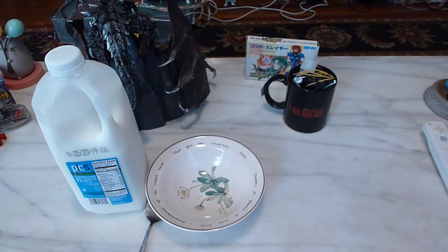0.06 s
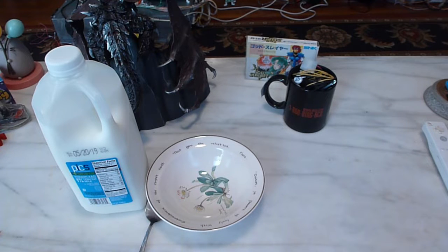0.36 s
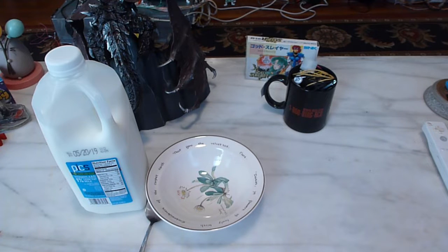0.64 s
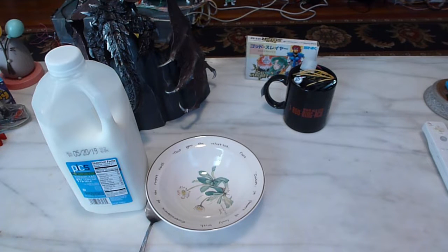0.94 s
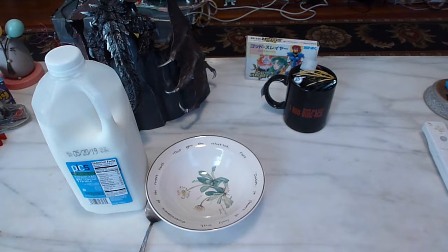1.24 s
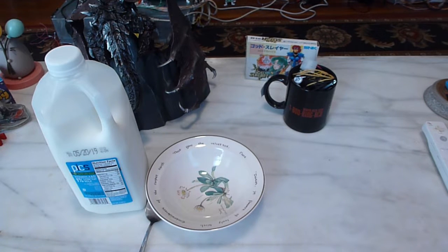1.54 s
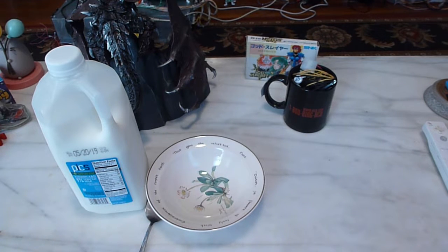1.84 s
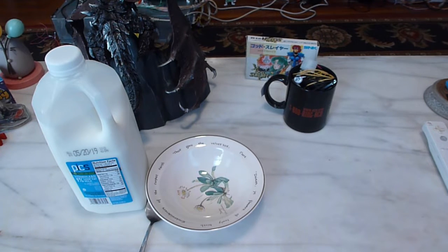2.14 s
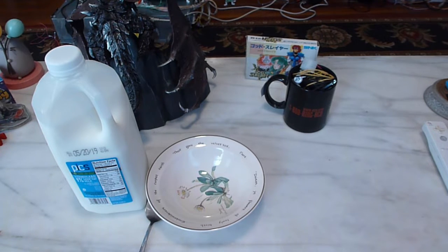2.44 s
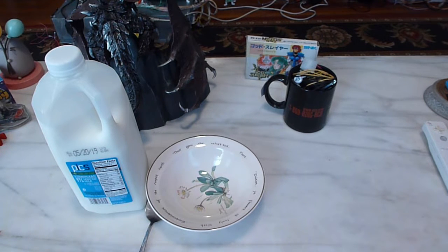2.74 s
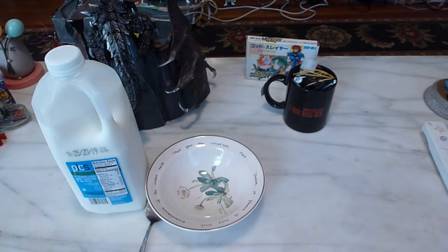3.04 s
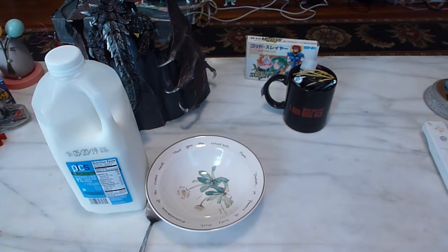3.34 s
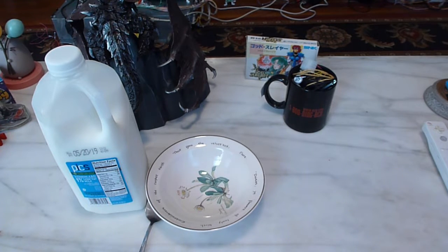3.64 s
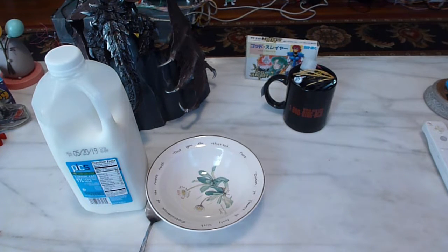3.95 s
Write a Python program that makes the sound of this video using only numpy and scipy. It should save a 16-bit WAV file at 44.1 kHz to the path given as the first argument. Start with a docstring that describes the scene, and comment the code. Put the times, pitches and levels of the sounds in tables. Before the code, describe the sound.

A plastic liner bag crackles inside a cereal box, with cardboard scrapes and two thumps.

```python
"""Cereal box and liner bag

Hands work at the bag inside a cereal box, a little way off in a small room. The bag crackles
in handfuls of tiny clicks, and single creases snap. Mostly later on, card scrapes on card,
the flaps knock, and the box bumps on the table and makes it hum."""
import sys
import numpy as np
from scipy import signal
from scipy.io import wavfile

SR = 44100
rng = np.random.default_rng(int(sys.argv[2]) if len(sys.argv) > 2 else 0)


def log_audio(samples):
    """Write samples as a 16-bit WAV file to the path given in sys.argv[1]."""
    # one column per channel
    frames = np.atleast_2d(samples).T
    # limit to full scale, then quantise
    limited = np.clip(frames, -1, 1)
    pcm = np.round(limited * 32767).astype(np.int16)
    wavfile.write(sys.argv[1], SR, pcm)


N = 176400


def amp(db):
    """Turns decibels into a number to multiply by."""
    return 10 ** (np.asarray(db) / 20)


def unit(x):
    """Scales a sound to an average (rms) level of one."""
    return x / np.sqrt(np.mean(x ** 2) + 1e-20)


def read(points, hz):
    """Looks up values between a table's rows, on a log-frequency scale."""
    f, value = np.transpose(points)
    return np.interp(np.log(hz + 1), np.log(f + 1), value)


def add(mix, s, sound):
    """Mixes a sound in, starting at s seconds."""
    part = mix[max(round(s * SR), 0):][:len(sound)]
    part += sound[:len(part)]


def colour(x, points, size=4096):
    """Shapes the bass and treble to follow a table, with no ringing ahead of a click."""
    log_gain = np.log(amp(read(points, abs(np.fft.fftfreq(size, 1 / SR)))))
    response = np.exp(np.conj(signal.hilbert(log_gain)))
    taps = np.fft.ifft(response).real[:size // 2]
    return signal.oaconvolve(x, taps)[:len(x)]


def ring(x, hz, q):
    """Makes a sound ring at one pitch; a higher q rings longer."""
    return signal.lfilter(*signal.iirpeak(min(hz, SR / 4), max(q, .6), SR), x)


def effort(rows, curve):
    """Each hand movement swells and dies away; overlapping ones add in power."""
    t, power = np.arange(N) / SR, 0
    for s, rise, fall, db in rows:
        from_peak = abs(t - s) / np.where(t < s, rise, fall)
        power += amp(db) ** 2 * np.exp(-2 * from_peak ** curve)
    return np.sqrt(power)


def crackle(level, per_s, thinning, spread_db, cap, q, plain, low_hz, high_hz, count=14):
    """Tiny random clicks each ring one small patch; they thin out as the hands ease off."""
    out, density = np.zeros(N), (level / level.max()) ** thinning
    for hz in np.geomspace(low_hz, high_hz, count):
        size = amp(spread_db * np.minimum(rng.exponential(1, N), cap)) * rng.choice([-1, 1], N)
        happens = rng.random(N) < density * per_s / count / SR
        clicks = size * happens / np.sqrt(density + .0087)  # makes up for having fewer clicks
        out += ring(clicks, hz, q) + plain * clicks
    return out


def blows(rows, q, chatter, chatter_s, low, high, size=4096):
    """A sharp push and a brief chatter ring the spot hit, from low to high times its pitch."""
    out, t = np.zeros(N), np.arange(size) / SR
    for (s, db, hz), noise in zip(rows, rng.standard_normal((len(rows), size))):
        push = (t == 0) + chatter * noise * np.exp(-t / chatter_s)
        band = signal.butter(2, [low * hz, min(high * hz, SR / 3)], "band", fs=SR, output="sos")
        hit = signal.sosfilt(band, ring(push, hz, q))
        add(out, s, amp(db) * hit / abs(hit).max())
    return out


# Tone of the quiet room: f/Hz, relative level/dB
AIR_TONE = [(25, -18), (60, -7.5), (400, -3), (2000, -15), (12000, -48)]
def air():
    """A faint, steady, low rush fills the room."""
    return amp(-48) * unit(colour(rng.standard_normal(N), AIR_TONE))


# How long the room's echo takes to fade by 60 dB: f/Hz, fade/s
ECHO_FADES = [(100, 0.26), (500, 0.38), (4500, 0.59), (12000, 0.3)]
def room(x, early_db, early_s, tail_db, moves_per_s=9, size=32768, count=4):
    """Quick echoes, then a fading tail; the pattern shifts as the sounding spot moves over the box."""
    t, out = np.arange(size) / SR, x
    moves = moves_per_s * np.arange(N) / SR
    for k in range(count):
        taps = rng.choice([-1., 1.], (2, size)) * (rng.random((2, size)) < 3000 / SR) * (t > .002)
        early = taps[0] * np.exp(-t / early_s)
        hz, when, bands = signal.stft(taps[1], SR, nperseg=256)
        fade = np.exp(-np.log(1000) * when / read(ECHO_FADES, hz)[:, None])
        tail = signal.istft(bands * fade, SR)[1][:size]
        echo = amp(early_db) * early / np.linalg.norm(early) + amp(tail_db) * tail / np.linalg.norm(tail)
        share = np.sqrt(2 / count) * np.cos(np.pi * (moves * (1 + k / count) + k / count))
        out = out + signal.fftconvolve(x * share, echo)[:N]
    return out / np.sqrt(1 + amp(early_db) ** 2 + amp(tail_db) ** 2)


# The box walls bending: peak t/s, rise/s, fall/s, level/dB
WALL_BENDS = [(.57, 0.015, 0.026, -41.5), (1.82, 0.043, .044, -36.5), (2.12, .11, .055, -48.5),
              (3.035, 0.018, 0.095, -39)]
# Their tone: f/Hz, relative level/dB
WALL_TONE = [(30, -49), (60, 4), (170, 9), (300, 5.5), (700, -55)]
def box_walls():
    """The walls of the box bend under the hands with a soft, low flutter."""
    return unit(colour(rng.standard_normal(N), WALL_TONE)) * effort(WALL_BENDS, curve=2.4)


# Notes the table top rings with: f/Hz, peak level/dB, time to fade by 60 dB/s
TABLE_NOTES = [(62.5, -44, 0.4), (115, -27, .28), (177, -33, 0.4)]
def table_bump(start_s=3.03, settle_s=.031, size=32768):
    """The box judders to rest and shakes the table top into a brief, rough hum."""
    out, t = np.zeros(N), np.arange(size) / SR
    judder = rng.standard_normal(size) * np.exp(-t / settle_s)
    for hz, db, fade_s in TABLE_NOTES:
        hum = ring(judder, hz, q=np.pi * hz * fade_s / np.log(1000))
        add(out, start_s, amp(db) * hum / abs(hum).max())
    return out


# Flat blows on a broad side of the box: t/s, peak level/dB, f/Hz
SIDE_THUMPS = [(3.3456, -2.5, 187), (3.7393, -1.5, 333)]
def box_thumps(size=2048):
    """A flat blow drives out one quick puff of air, shorter the higher its pitch."""
    out, t = np.zeros(N), (np.arange(size) - size // 2) / SR
    for s, db, hz in SIDE_THUMPS:
        from_peak = 2 * np.pi * hz * abs(t)
        add(out, s + t[0], amp(db) * (1 - from_peak) * np.exp(-from_peak))
    return out


# Knocks on the panels and flaps: t/s, peak level/dB, f/Hz
FLAP_KNOCKS = [(1.154, -19, 450), (2.467, -30, 397), (2.475, -21, 338), (2.978, -14, 380),
               (3.028, -24, 590), (3.3445, -12.5, 810), (3.349, -8, 1040), (3.585, -14, 603),
               (3.601, -19, 377), (3.7385, -7, 265), (3.739, -15, 686)]
def flap_knocks():
    """Knocked card rings for a moment, with hardly any chatter."""
    return blows(FLAP_KNOCKS, q=2.4, chatter=.025, chatter_s=.0035, low=.5, high=2.5)


# Notes the hollow box rings with: f/Hz
PANEL_NOTES = [256, 442, 710, 785, 823, 1040]
def hollow_box(x, q, db):
    """The panels of the box add a short ring to whatever shakes them."""
    return x + amp(db) * sum(ring(x, hz, q) for hz in PANEL_NOTES)


# Card sliding on card: peak t/s, rise/s, fall/s, level/dB
CARD_SCRAPES = [(.3, .07, 0.033, -34), (.97, 0.041, 0.064, -34.5), (1.255, 0.031, .02, -26),
                (1.79, 0.04, 0.055, -31), (2.67, 0.044, .04, -39.5), (2.778, 0.016, 0.016, -25),
                (2.92, 0.082, 0.096, -30), (3.034, 0.016, 0.036, -27.5), (3.245, 0.016, 0.096, -23.5),
                (3.345, 0.018, 0.021, -19.5), (3.39, 0.046, 0.12, -34), (3.665, 0.012, .02, -28),
                (3.728, 0.055, 0.038, -21.5), (3.83, 0.055, 0.065, -28.5), (3.985, 0.023, 0.066, -29.5)]
# Its tone: f/Hz, relative level/dB
CARD_TONE = [(40, -27), (150, -9.5), (300, -2.5), (480, 0), (950, -4), (1600, -11), (2500, -17),
             (5600, -35.5), (12000, -54)]
def card_scrapes():
    """Card slides in many tiny slips, denser and duller than the bag's crackle."""
    level = effort(CARD_SCRAPES, curve=1.6) + amp(-60)
    slips = crackle(level, per_s=12000, thinning=.4, spread_db=4.5, cap=2.24,
                    q=1.78, plain=.12, low_hz=137, high_hz=5800)
    return unit(hollow_box(colour(slips, CARD_TONE), q=32, db=-7.5)) * level


# Single creases snapping: t/s, peak level/dB, f/Hz
CREASE_SNAPS = [(.015, -21.5, 1500), (.087, -20, 950), (.229, -26, 1910), (.324, -14, 2480),
                (.430, -13, 4930), (.4548, -12, 1585), (.481, -17, 1800), (.635, -20.5, 4060),
                (.727, -18.5, 1590), (.811, -17, 1950), (.910, -20, 3470), (.937, -17, 1880),
                (.975, -15, 1620), (1.053, -35, 1710), (1.071, -16, 3280), (1.153, -14.5, 1310),
                (1.184, -24, 800), (1.213, -28, 1420), (1.226, -13.5, 1400), (1.255, -22, 855),
                (1.403, -18, 1260), (1.681, -14, 1960), (1.779, -14.5, 1130), (1.808, -16.5, 1510),
                (2.064, -24.5, 1310), (2.104, -24, 1750), (2.252, -20, 1440), (2.442, -21.5, 1180),
                (2.578, -21.5, 1500), (2.747, -24.5, 4020), (3.168, -30, 4540), (3.335, -4.5, 1420),
                (3.340, -12, 5400), (3.824, -15.5, 1380), (3.863, -21, 4000), (3.965, -14.5, 1010)]
def crease_snaps():
    """A crease gives way with a sharp click that barely rings."""
    return blows(CREASE_SNAPS, q=.98, chatter=.18, chatter_s=.0027, low=.25, high=1.64)


def clumps(per_s, fade_s, steady):
    """Creases give way in small bursts: each starts at once and quickly runs out."""
    starts = 1. * (rng.random(N) < per_s / SR)
    bursts = signal.lfilter([1], [1, -np.exp(-1 / (fade_s * SR))], starts)
    return np.sqrt(steady + bursts)


# Squeezes of the bag: peak t/s, rise/s, fall/s, level/dB
BAG_SQUEEZES = [(0.0, .021, 0.025, -32.5), (.098, 0.039, 0.029, -29.5), (.215, 0.041, 0.046, -29.5),
                (.318, 0.094, 0.044, -26.5), (.48, 0.067, .07, -34.5), (.595, 0.033, 0.024, -35),
                (.642, 0.0076, 0.024, -30), (.735, 0.053, 0.021, -34.5), (.83, 0.053, .15, -31),
                (.965, .035, 0.043, -27.5), (1.075, 0.028, 0.16, -34), (1.24, 0.035, 0.056, -27.5),
                (1.41, 0.053, 0.027, -35.5), (1.495, 0.037, 0.053, -31), (1.6, 0.01, 0.027, -36.5),
                (1.672, .025, 0.018, -33), (1.722, .02, 0.032, -26.5), (1.83, 0.052, 0.04, -30.5),
                (2.06, .025, 0.028, -35), (2.142, 0.047, 0.049, -28), (2.29, 0.038, 0.11, -45.5),
                (2.48, 0.085, 0.1, -48.5), (2.585, 0.011, 0.027, -34.5), (2.9, 0.064, 0.052, -31.5),
                (3.17, 0.017, 0.011, -30), (3.347, 0.028, 0.04, -30), (3.72, 0.05, 0.033, -38.5),
                (3.85, 0.064, 0.052, -38.5)]
# The bag's tone: f/Hz, relative level/dB
BAG_TONE = [(40, -51), (90, -12.5), (220, -12), (480, -2.5), (800, -5.5), (1450, -10), (2050, -9),
            (4000, -16), (5600, -19.5), (12000, -24)]
def bag_crackle():
    """The bag crackles in clumps as hard as it is squeezed, and a little in between."""
    level = effort(BAG_SQUEEZES, curve=1.6) + amp(-53)
    clicks = crackle(level, per_s=7500, thinning=.6, spread_db=4, cap=3.2,
                     q=1.95, plain=.15, low_hz=120, high_hz=7460)
    bursts = clumps(per_s=130, fade_s=.0025, steady=.16)
    return unit(colour(clicks * bursts, BAG_TONE)) * level


def scene():
    """The bag and the box echo in the room, over its faint background."""
    rustle = bag_crackle() + card_scrapes() + crease_snaps()
    hits = box_thumps() + flap_knocks()
    background = air()
    rustle = room(rustle, early_db=-15, early_s=.0044, tail_db=-4.5)
    hits = room(hits, early_db=-6, early_s=.0056, tail_db=-8.5)
    return (background + rustle + hits + table_bump() + box_walls())[None]


# The shape of the treble: f/Hz, level/dB
TREBLE_TONE = [(5600, 0), (6300, -5.5), (7000, -13.5), (7500, -27.5), (8000, -50), (8800, -22),
               (10000, -13), (12000, -21.5), (14000, -35)]
def record(dry, low_hz=42, high_hz=14400):
    """The treble falls away to a deep dip at 8 kHz, with a faint band of fizz above it."""
    bass_cut = signal.butter(4, low_hz, "high", fs=SR, output="sos")
    treble_cut = signal.firwin(511, high_hz, window=("kaiser", 9), fs=SR)
    heard = signal.sosfilt(bass_cut, colour(dry[0], TREBLE_TONE))
    return signal.oaconvolve(heard, treble_cut, "same")[None]


dry = scene()
out = record(dry)
log_audio(out)
```